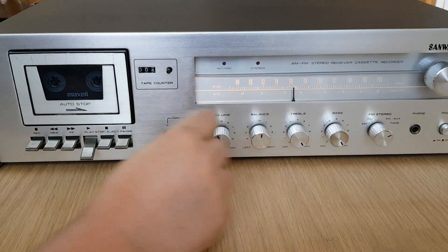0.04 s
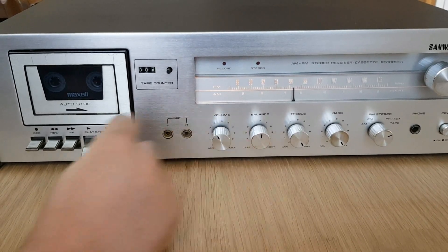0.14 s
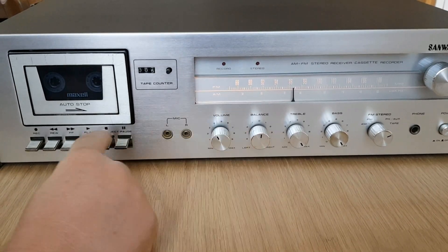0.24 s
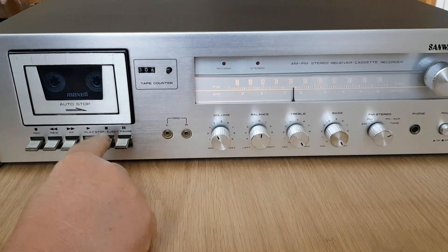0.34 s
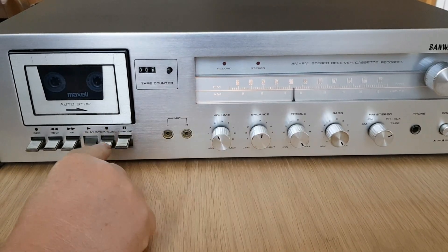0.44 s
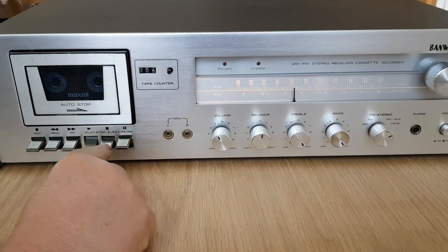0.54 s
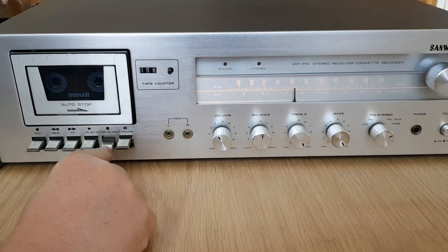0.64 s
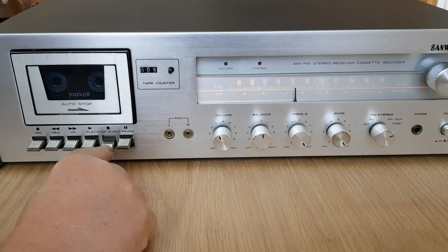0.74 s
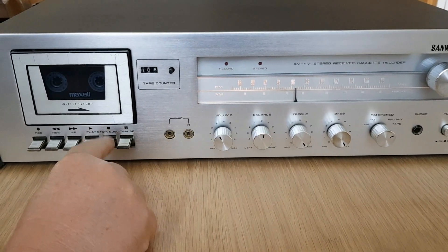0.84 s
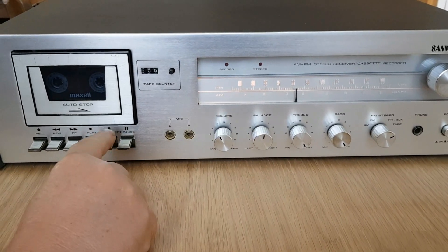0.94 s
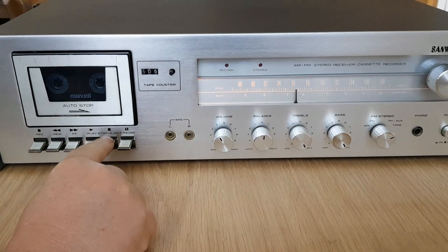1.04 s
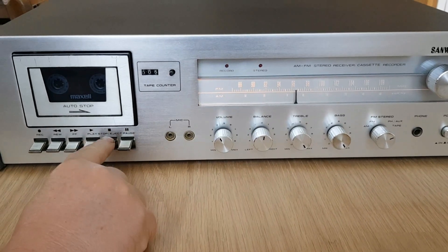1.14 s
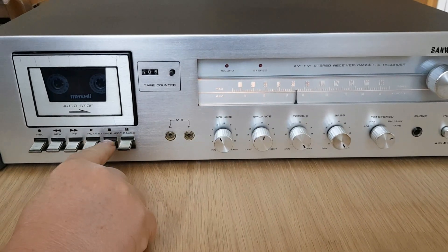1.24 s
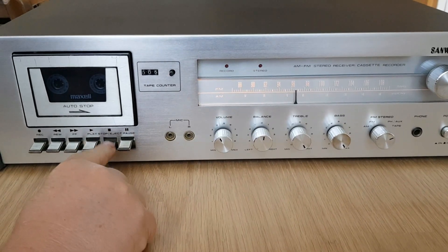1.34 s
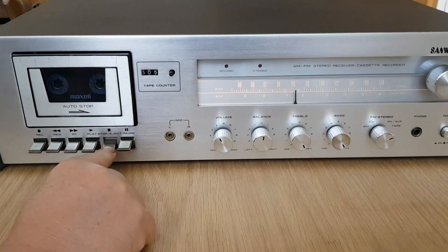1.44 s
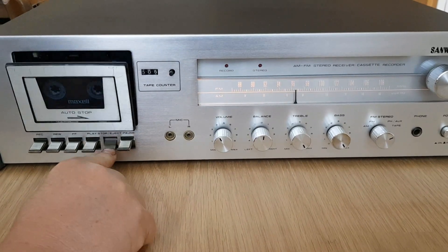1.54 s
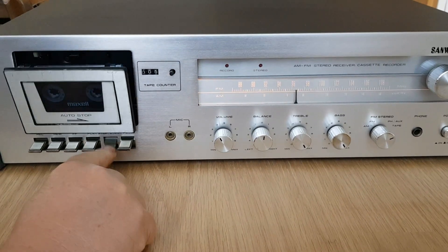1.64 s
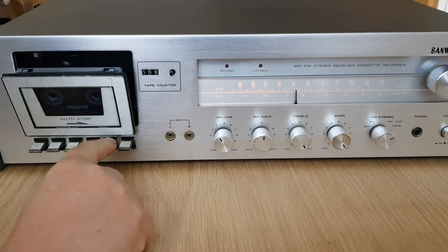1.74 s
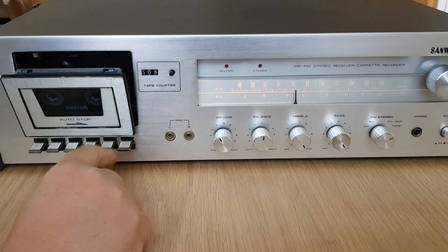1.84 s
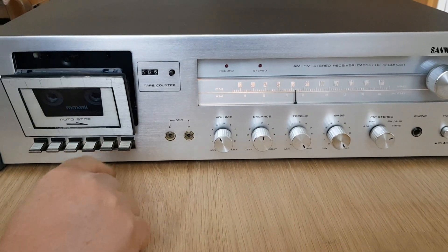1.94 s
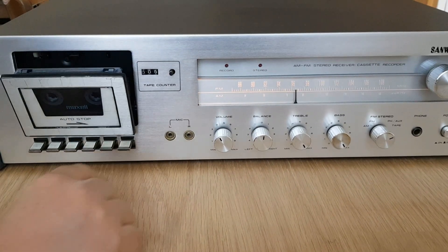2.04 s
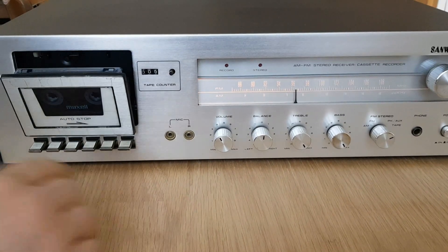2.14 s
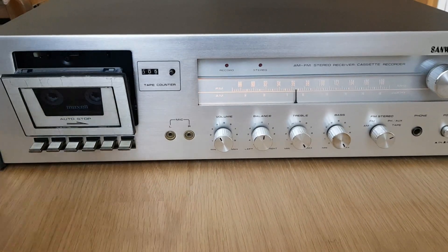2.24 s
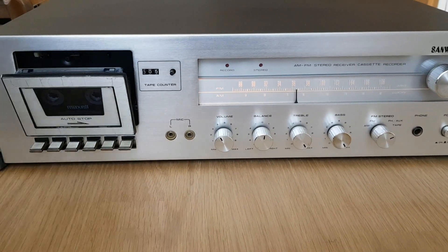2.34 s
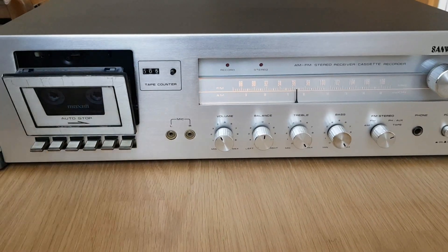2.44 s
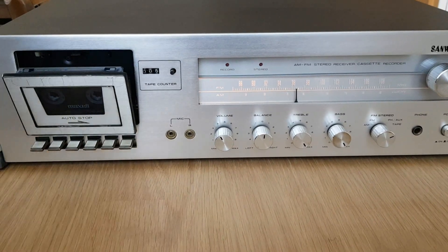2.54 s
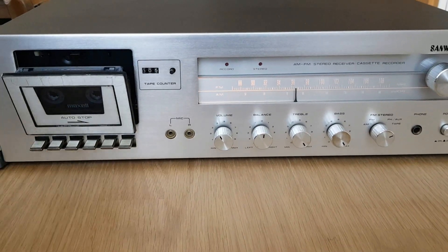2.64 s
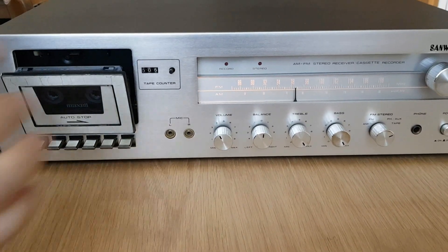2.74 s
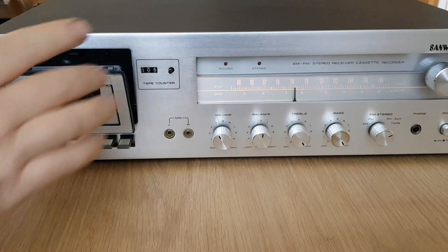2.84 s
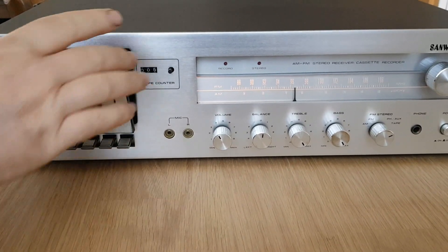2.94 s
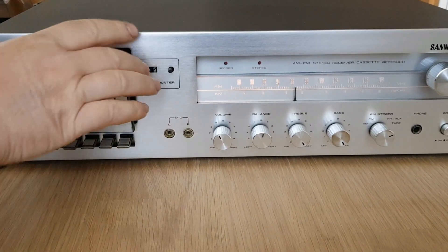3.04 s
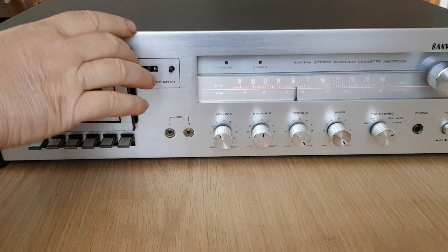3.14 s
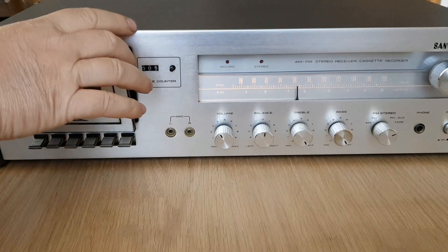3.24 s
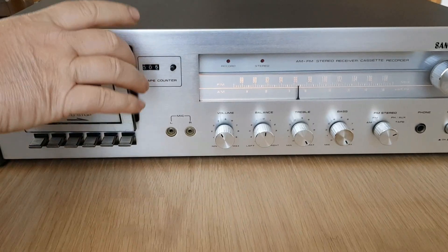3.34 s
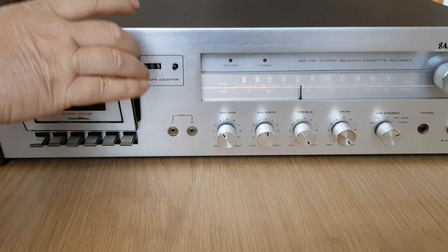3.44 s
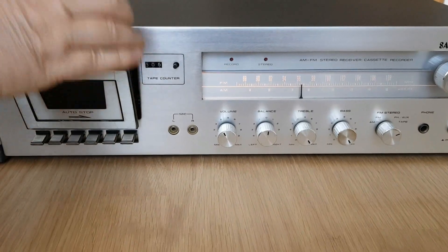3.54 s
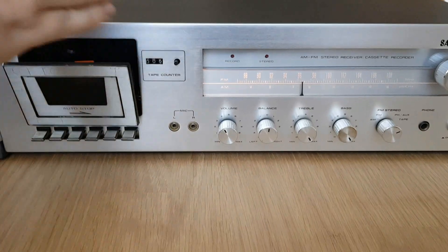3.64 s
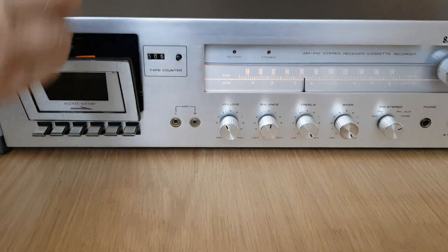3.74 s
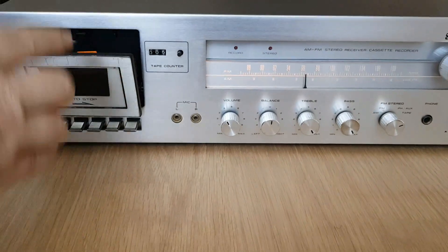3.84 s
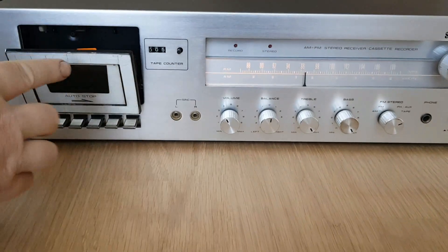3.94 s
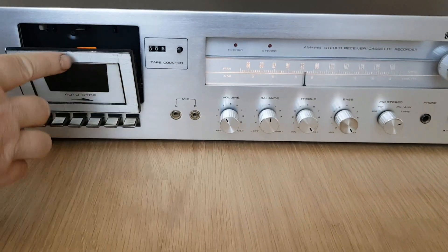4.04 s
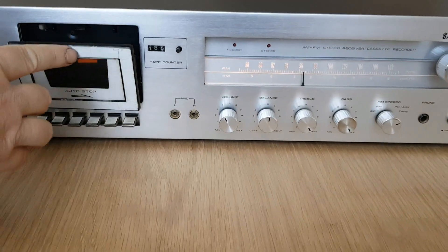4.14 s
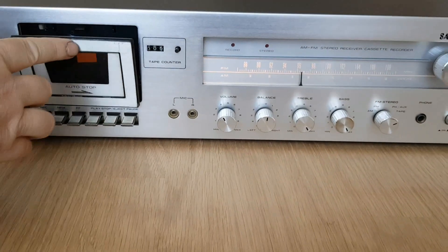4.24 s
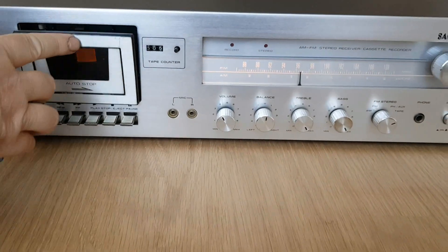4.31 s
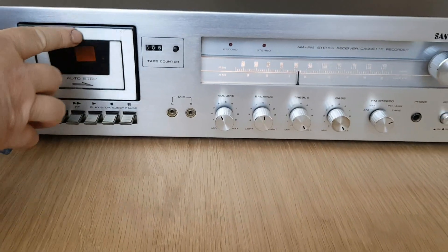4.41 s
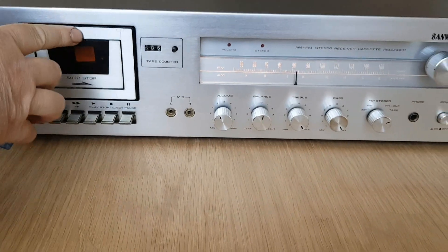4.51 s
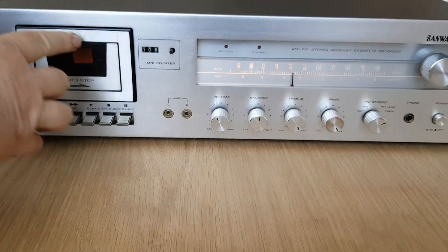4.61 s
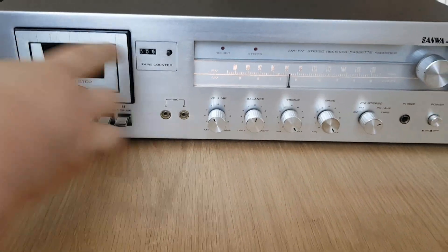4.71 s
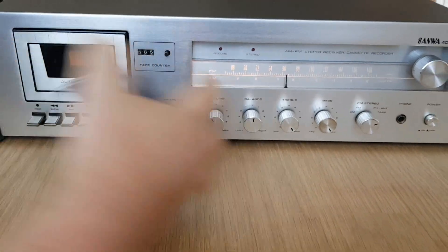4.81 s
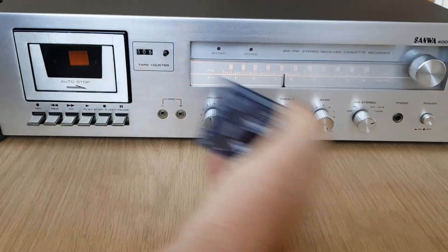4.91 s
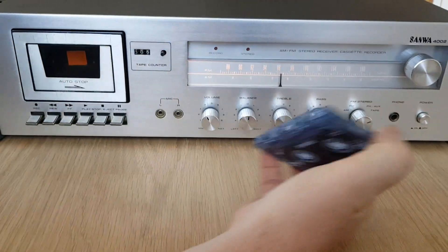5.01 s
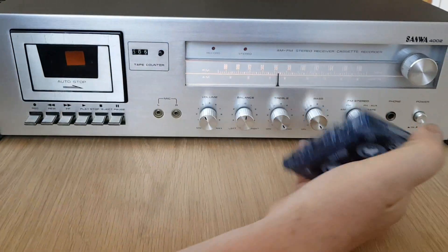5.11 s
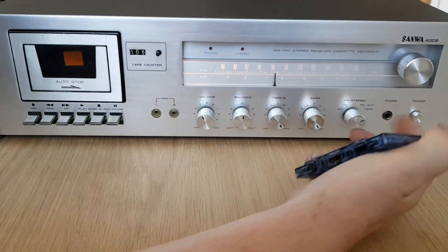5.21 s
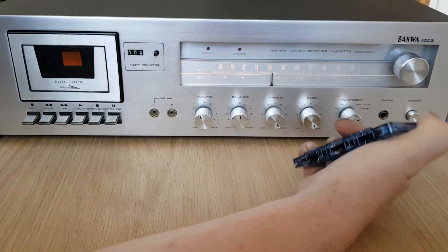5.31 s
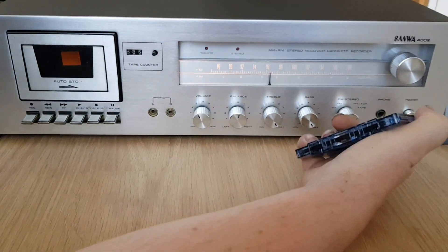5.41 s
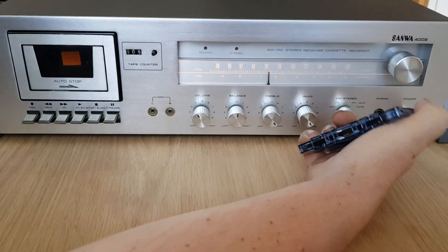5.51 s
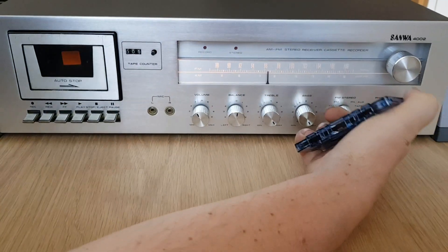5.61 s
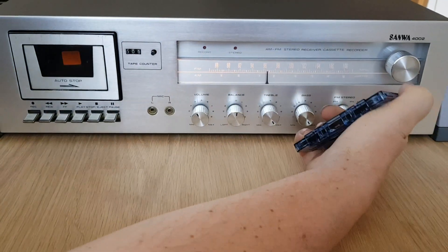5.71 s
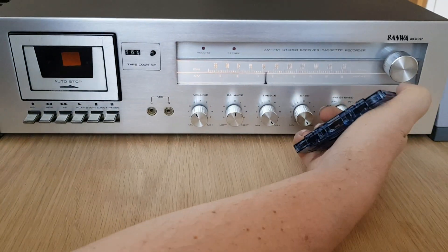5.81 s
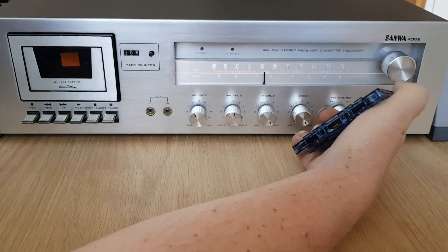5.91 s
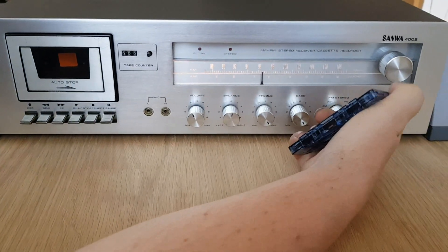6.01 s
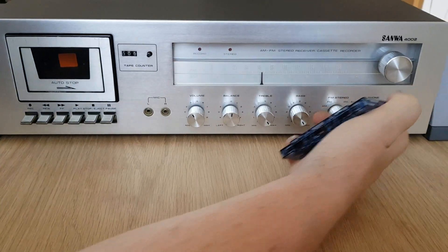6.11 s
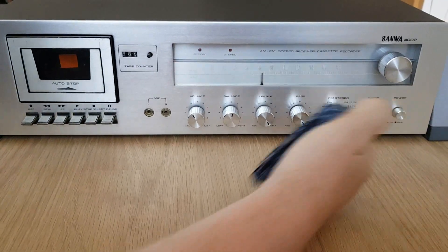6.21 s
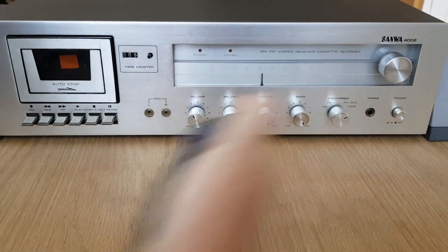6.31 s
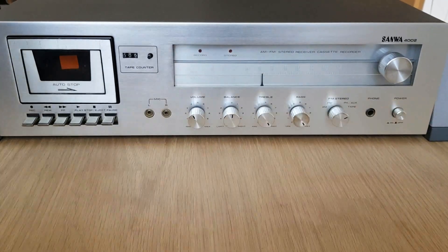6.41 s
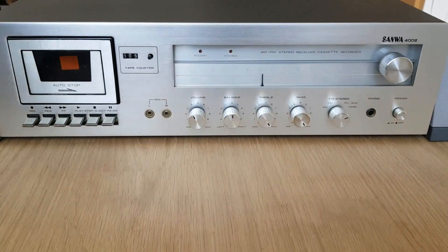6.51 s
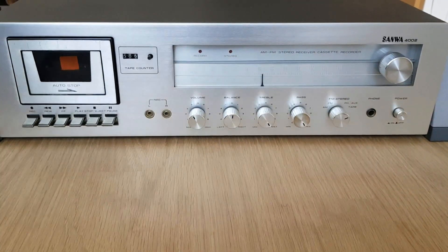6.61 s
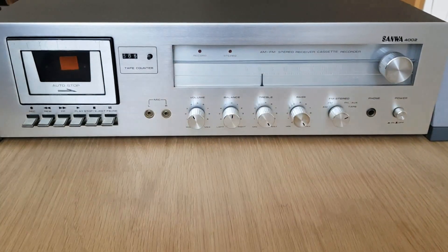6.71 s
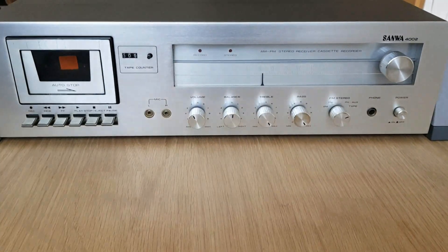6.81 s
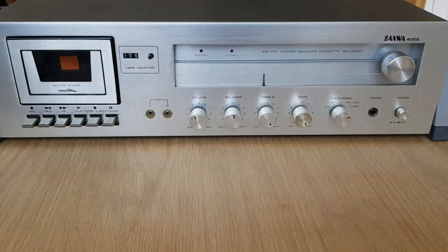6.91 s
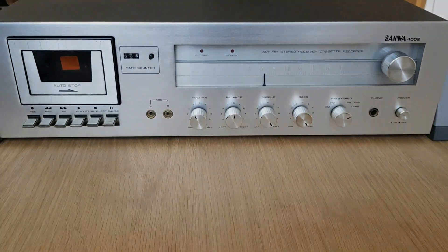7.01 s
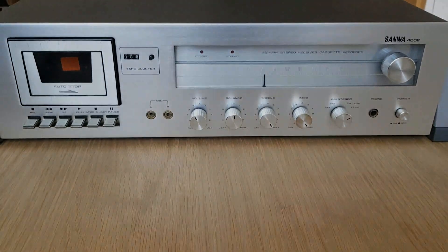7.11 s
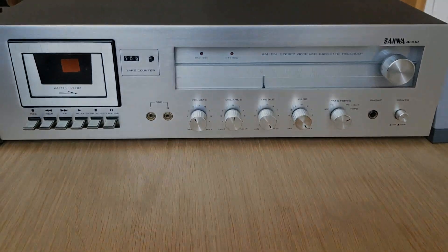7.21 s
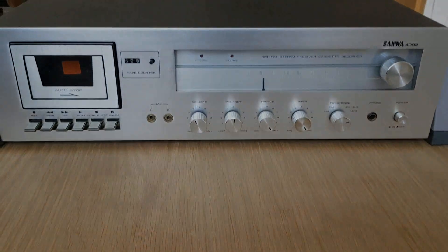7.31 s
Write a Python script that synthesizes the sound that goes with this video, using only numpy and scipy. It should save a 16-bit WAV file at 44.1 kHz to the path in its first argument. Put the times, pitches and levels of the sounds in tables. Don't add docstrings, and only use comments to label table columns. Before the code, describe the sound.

Close hard key clunks and a springy door clatter in a quiet room, then squeaky plastic scraping, a shutting click and small cassette rattles.

```python
import sys
import numpy as np
from scipy import signal
from scipy.fft import rfft, irfft, next_fast_len
from scipy.io import wavfile
from scipy.ndimage import uniform_filter1d, map_coordinates

SR = 44100
rng = np.random.default_rng(int(sys.argv[2]) if len(sys.argv) > 2 else 0)


def voltage_ratio(decibels):
    exponent = np.asarray(decibels, float) / 20
    return 10 ** exponent


def bounce(signal):
    frames = np.transpose(np.atleast_2d(signal))
    limited = np.clip(frames, -1, 1)
    pcm = np.round(limited * 32767).astype(np.int16)
    wavfile.write(sys.argv[1], SR, pcm)


N = 324352
T = np.arange(N) / SR


def unit(x):
    return x / np.sqrt(np.mean(x ** 2) + 1e-20)


def along(points, hz):
    f, v = np.transpose(points)
    return np.interp(np.log(hz + 1), np.log(f + 1), v, left=v[0] - 20)


def curves(rows):
    s, *cols = np.transpose(rows)
    return [np.interp(T, s, c, left=-150, right=-150) for c in cols]


def wobble(rate):
    return map_coordinates(rng.standard_normal(int(N * rate / SR) + 4), [T * rate])


def filtered(x, response):
    m = next_fast_len(x.shape[-1] + 2048, real=True)
    return irfft(rfft(x, m) * response(np.fft.rfftfreq(m, 1 / SR)), m)[..., :x.shape[-1]]


def hiss(spectrum):
    return unit(filtered(rng.standard_normal(N), lambda hz: voltage_ratio(along(spectrum, hz))))


def add(track, s, sound):
    at = round(s * SR)
    track[..., at:at + sound.shape[-1]] += sound[..., :N - at]


def patchy(x, patchy_db):
    z = signal.stft(x, nperseg=1024)[2]
    field = uniform_filter1d(uniform_filter1d(rng.standard_normal(z.shape), 20, 0), 16, 1)
    return unit(signal.istft(z * voltage_ratio(patchy_db * unit(field)), nperseg=1024)[1][:N])


def floor():
    # time in seconds, level in dB.
    air_gain = [(0, -66.5), (.5, -68.5), (2.2, -68.5), (3, -70.5), (4.1, -70.5), (4.7, -68.5),
                (5.25, -63.5), (5.6, -69.5), (6.2, -64.5), (6.35, -73), (6.85, -79.5), (7.35, -83)]
    # Hz, level in dB.
    open_colour = [(6500, -40.5), (8000, -12.5), (9500, -1), (11300, 3), (13000, 2.5), (15500, -6.5)]
    whistle_colour = [(7000, -39.5), (8500, -19.5), (9500, -11), (11300, 1), (12300, -14), (15500, -11.5)]
    preamp_colour = [(40, 1), (200, -2.5), (500, -10.5), (1500, -15), (5000, -22.5), (8000, -27.5),
                     (15000, -30.5)]
    room_colour = [(300, -11.5), (600, -4), (1500, -6.5), (3700, -8.5), (4150, -2), (6000, -4),
                   (7500, -16.5), (8500, -29)]
    drone_colour = [(25, 1), (45, -1.5), (120, -9.5), (190, -0.5), (310, -8.5), (400, -16.5), (600, -41.5)]
    # Hz, level in dB.
    mains = [(95, -65), (150, -61), (250, -65), (300, -70.5), (550, -83.5)]
    hiss_db, = curves(air_gain)
    room_db = -68 + 1.1 * (hiss_db + 67.5)
    drone_db = -64 + 0.6 * (hiss_db + 67.5)

    start_s, end_s, depth_db, edge_s = 2.14, 3.7, 5.5, 0.067
    lull = np.interp(T, [start_s - edge_s, start_s, end_s, end_s + 25 * edge_s], [0, 1, 1, 0])
    murmur_db = -68 + 0.96 * (hiss_db + 68.0) - depth_db * lull

    hum = sum(voltage_ratio(db + wobble(9.7)) * np.sin(2 * np.pi * hz * T) for hz, db in mains)
    drone = voltage_ratio(drone_db + 62.5) * hum
    drone += voltage_ratio(drone_db + 1.5 + 0.66 * wobble(2.1)) * hiss(drone_colour)
    tone = patchy(hiss(room_colour), patchy_db=1.7)
    murmur = filtered(tone, lambda hz: hz < 3800)
    left = voltage_ratio(hiss_db + 4.5 + 1.1 * wobble(28)) * patchy(hiss(open_colour), patchy_db=1.0)
    left += voltage_ratio(room_db + 2.5) * (tone - murmur) + voltage_ratio(murmur_db + 4.0) * murmur
    right = voltage_ratio(hiss_db + 1.0) * hiss(whistle_colour) + voltage_ratio(-75.0) * hiss(preamp_colour)
    return np.array([left + drone, right + voltage_ratio(-23.5) * drone])


def ringing(modes, ring_db):
    return lambda f: 1 + sum(voltage_ratio(db + ring_db) * 1j * f * w / (c * c - f * f + 1j * f * w) for c, w, db in modes)


def contacts(events, modes, touch, ring_db, gain_db, spiky_db):
    # Hz, level in dB.
    clack_colour = [(200, -19), (500, 2.5), (1500, -1.5), (4500, -5.5), (6300, -9.5), (7800, -13),
                    (10000, 4), (15000, 1)]
    track, t = np.zeros(N), np.arange(6000) / SR
    lead = .008
    tick_db, brighter, rattle_s, longer, thin_db = touch

    def dull(hz):
        return 1 / (1 + (hz / 5000) ** 2)

    for s, db, body_db, part_hz in events:
        lighter_db = -40 - db
        t60 = rattle_s * voltage_ratio(longer * lighter_db)
        top_db = tick_db + brighter * lighter_db + thin_db * np.log2(part_hz / 2000)
        tilt = [(300, body_db), (1800, body_db), (3000, 0), (7000, 0.00086), (9000, top_db)]
        grit = rng.standard_normal(len(t)) * voltage_ratio(spiky_db * np.repeat(rng.standard_normal(300), 20))
        part = ringing([(part_hz, part_hz / 8, 0)], ring_db=4)

        def shape(hz):
            colour = voltage_ratio(along(clack_colour, hz) + along(tilt, hz)) * part(hz)
            return colour * [dull(hz), 1 - dull(hz)]

        body, tick = filtered(grit / np.std(grit), shape)
        away = np.abs(t - lead)
        fall_db = -60 * (away / np.clip(t60, .01, .25)) ** 1.223
        rise = max(.0008 - .000025 * (db + 15), .0003)
        swell = voltage_ratio(-30.0) * t / lead + (1 - np.exp(-np.maximum(t - lead, 0) / rise)) ** 2
        crack = 1 + 2.5 * voltage_ratio(-60 * away / 0.0096)
        chatter = body * voltage_ratio(fall_db) + tick * voltage_ratio(2.18 * fall_db) * crack
        add(track, s - lead - .001, voltage_ratio(db + gain_db) * swell * chatter)
    return filtered(track, ringing(modes, ring_db))


def cabinet():
    # time in seconds, peak in dB, table boom in dB over it.
    thuds = [(0.403, -53, -29), (0.594, -26.5, -15), (0.611, -27, -2), (0.79, -33, -13),
             (1.183, -61.5, -13.5), (1.345, -41.5, -5), (1.433, -31, -9.5), (1.46, -33, -2),
             (1.661, -40, -9), (2.826, -53.5, -12), (3.157, -41.5, -5.5), (3.419, -43.5, 1),
             (4.407, -32, -3.5), (4.428, -31, -5), (5.839, -59, 4.5), (6.031, -50.5, 0)]
    # Hz, level in dB, t60 in seconds.
    case_modes = [(214.1, 3, 0.21), (301.4, -6, 0.16), (423.3, -12, 0.27), (491, -8.5, .2),
                  (614.3, -7.5, 0.17)]
    table_modes = [(132.5, 0.5, 0.52), (57.7, -11.5, 0.7)]
    # Hz, level in dB.
    panel_colour = [(60, -18), (120, -1), (220, 3), (450, -9), (800, -29.5)]
    track, t = np.zeros(N), np.arange(SR // 2) / SR
    boom = sum(voltage_ratio(level - 60 * t / t60) * np.sin(2 * np.pi * hz * t) for hz, level, t60 in table_modes)
    boom = boom * (1 - np.exp(-t / 0.0056))
    panels = hiss(panel_colour)
    for s, db, boom_db in thuds:
        case = voltage_ratio(-11.5 - 60 * t / 0.38) * panels[round(s * SR):][:len(t)]
        for hz, level, t60 in case_modes:
            ring_db = level + rng.normal(0, 0.83) - 60 * t / t60
            case += voltage_ratio(ring_db) * np.sin(2 * np.pi * hz * rng.normal(1, .006) * t)
        blow = case * (1 - np.exp(-t / 0.0029)) + voltage_ratio(boom_db) * boom
        add(track, s, voltage_ratio(db + 4.5) * blow * np.cos(np.pi * t))
    return track * voltage_ratio(1.2 * wobble(25))


def keys():
    # time in seconds, clack in dB, body in dB over the clack, struck part in Hz.
    key_hits = [
        (0.4094, -65, 6, 1230),
        (0.5922, -18.5, -7.5, 5400),
        (0.6006, -19.5, -5.5, 1040),
        (0.6164, -33, 0.5, 1000),
        (0.7745, -40, -3, 1110),
        (0.78, -19, -3, 1197),
        (0.7845, -29, -3, 4150),
        (0.8228, -37, 0, 800),
        (1.1692, -56.5, -6.5, 1490),
        (1.3396, -31.5, -5, 3050),
    ]
    # Hz, width in Hz, level in dB.
    key_modes = [(796, 53, 0.5), (1110, 240, -3), (1540, 67, -8.5), (2100, 100, -6), (2900, 120, -12),
                 (4170, 150, -4.5)]
    return contacts(key_hits, key_modes, (-10.5, 0.17, 0.1, 0.13, 4), ring_db=4.0, gain_db=8, spiky_db=4)


def door():
    # time in seconds, clack in dB, body in dB over the clack, struck part in Hz.
    door_hits = [(1.427, -37.5, 4, 1120), (1.4312, -15.5, 1.5, 1560), (1.4368, -18, 3, 1590),
                 (1.4413, -16.5, -5, 4480), (1.4468, -17, -1.5, 2240), (1.4575, -14, 1, 4400),
                 (1.4615, -14.5, 1, 1570), (1.469, -21.5, 3, 1680), (1.481, -30, -4, 1520),
                 (1.4951, -38.5, 6, 1810), (1.62, -22, -3.5, 4840), (1.6569, -29.5, 5, 765),
                 (4.075, -74.5, 15, 600), (4.138, -45.5, -0.5, 2040), (4.2034, -58.5, 10.5, 1290),
                 (4.3843, -52.5, 15.5, 760), (4.3934, -24, -2.5, 3780), (4.4085, -15, -3.5, 2900),
                 (4.4298, -35.5, 5.5, 704)]
    # Hz, width in Hz, level in dB.
    door_modes = [(1190, 150, 0), (1590, 110, -0.5), (1990, 180, -4), (2360, 150, -6), (2900, 150, -6),
                  (4850, 330, -11)]
    touch = (-11, 0.06, 0.08, 0.34, 0.3)
    return contacts(door_hits, door_modes, touch, ring_db=-1.5, gain_db=5.5, spiky_db=-0.5)


def springs():
    # time in seconds, Hz, level in dB, t60 in seconds.
    coils = [
        (4.5, 503, -55.5, 2.8),
        (7.07, 870, -47.5, 0.2),
        (4.92, 850, -41, 0.18),
        (1.47, 1590, -34, 0.3),
        (1.49, 1790, -32.5, .3),
    ]
    track, t = np.zeros(N), np.arange(SR) / SR
    sway = np.cumsum(1 + .015 * wobble(60)[:SR]) / SR
    beat = voltage_ratio(1.8 * wobble(60)[:SR])
    for s, hz, db, t60 in coils:
        ring = beat * voltage_ratio(db - 60 * t / t60) * np.sin(2 * np.pi * hz * sway)
        add(track, s, ring * (1 - np.exp(-t / 0.0086)) * np.cos(np.pi * t / 2))
    return track * voltage_ratio(1.2 * wobble(25))


def jolt(t, db, hz):
    turns = 1.405 * hz * t / (1 + 16 * t)
    return voltage_ratio(db - 60 * (t * hz / 5) ** 1.33) * (1 - np.exp(-t / 0.0018)) * -np.cos(2 * np.pi * turns - 1.2)


def grip():
    # time in seconds, peak in dB, Hz.
    bumps = [(2.509, -44, 78), (2.715, -48.5, 96.7), (2.765, -47.5, 109), (2.836, -38, 107),
             (2.965, -42.5, 95.5), (3.047, -40.5, 87), (3.112, -44, 116), (3.239, -36, 148),
             (3.285, -37.5, 143), (3.374, -39, 68), (3.403, -43, 111), (3.481, -43, 115), (3.513, -50, 100),
             (3.594, -34, 160), (3.672, -47, 83.5), (3.753, -20.5, 108), (3.834, -46, 79.5),
             (4.006, -25, 108.3), (4.132, -50, 66), (4.633, -46.5, 82.3), (4.783, -44, 98),
             (4.874, -45.5, 97), (5.137, -45, 60.6), (5.536, -44.5, 65.2), (6.401, -43.5, 101),
             (6.462, -43, 77), (6.522, -37.5, 84.6), (6.654, -40, 98), (6.764, -39, 99.5), (6.932, -45, 93)]
    # time in seconds, level in dB.
    effort = [(0, -86), (2.4, -85), (2.5, -64.5), (3.3, -53), (3.8, -50), (4.15, -52), (4.22, -61.5),
              (4.6, -61.5), (5.2, -59.5), (5.3, -68), (5.55, -56), (5.65, -72), (6.2, -73), (6.3, -59.5),
              (6.8, -56), (7.05, -61.5), (7.15, -83), (7.35, -60.5)]
    track, t = np.zeros((2, N)), np.arange(SR // 6) / SR
    effort_db, = curves(effort)
    chance = rng.standard_normal((150, 3))
    spacing_s = .055
    when = spacing_s * (np.arange(len(chance)) + 2 + 0.247 * chance[:, 0])
    fidgets = []
    for s, (u, v) in zip(when, chance[:, 1:]):
        if s < T[-1] and effort_db[round(s * SR)] > -72:
            db = -51 + 0.67 * (effort_db[round(s * SR)] + 57) + 3.2 * u
            fidgets.append((s, db, 90 * voltage_ratio(2.65 * np.tanh(v))))
    for s, db, hz in bumps + fidgets:
        slow = voltage_ratio(1.28 * db - 1.5 - 60 * t / 0.17) * -np.sin(2 * np.pi * 62 * t) * (1 - np.exp(-t / 0.0067))
        add(track, s - .0065, np.array([slow, jolt(t, db + 4.5, hz)]))
        add(track[1], min(s + 0.0159, T[-1]), jolt(t, db - 4.0, .6 * hz))
    rumble = hiss([(25, -14.5), (50, 2.5), (130, -7), (300, -21.0), (500, -30.5), (900, -50.5)])
    rumble = rumble * voltage_ratio(effort_db + 4.3 * wobble(24))
    return track + rumble * voltage_ratio([[-22], [0]])


def scrape():
    # start, peak and end in seconds, rub in dB, grit in dB.
    strokes = [
        (2.95, 3.015, 3.32, -61, -69),
        (3.301, 3.416, 3.57, -45.5, -52.5),
        (4.75, 4.8, 4.9, -80, -67.5),
        (4.864, 4.94, 5.124, -56, -57),
        (5.05, 5.249, 5.5, -82, -63.5),
        (6.03, 6.042, 6.276, -54.5, -58.5),
        (6.02, 6.203, 6.38, -72, -57.5),
        (6.6, 6.678, 6.95, -65.5, -71),
        (7.052, 7.072, 7.3, -67.5, -66.5),
    ]
    # start and end in seconds, start and end in Hz, level in dB.
    squeaks = [
        (3.35, 3.453, 1645, 1624, -52),
        (3.366, 3.45, 2980, 2980, -50),
        (3.466, 3.506, 3110, 3070, -50),
        (3.495, 3.531, 3950, 4190, -56),
        (4.891, 4.95, 1604, 1494, -48),
        (4.198, 4.251, 1517, 1278, -59),
        (6.647, 6.708, 1635, 1500, -62),
    ]
    rub_fade_db, grit_fade_db = 24, 17.5
    rub, grit = np.zeros((2, N))
    for start, peak, end, rub_db, grit_db in strokes:
        rub_lo, grit_lo = rub_db - rub_fade_db, grit_db - grit_fade_db
        rub_curve, grit_curve = curves([(start, rub_lo, grit_lo), (peak, rub_db, grit_db), (end, rub_lo, grit_lo)])
        rub += voltage_ratio(rub_curve)
        grit += voltage_ratio(grit_curve)
    clumps = voltage_ratio(2.6 * wobble(400) + 2.2 * wobble(60))
    dull = hiss([(300, -3.5), (600, 2), (1500, -0.5), (2200, -8), (3500, -26.0)])
    sharp = hiss([(1500, -20.5), (2400, 0.5), (5500, 0), (7800, -18.5), (10000, -10.0), (15000, -9.5)])
    track = voltage_ratio(0.5) * rub * unit(clumps * dull) + voltage_ratio(1.5) * grit * unit(clumps * sharp)
    flutter, drift = voltage_ratio(4.8 * wobble(220)), 1 + 0.043 * wobble(300)
    for start, end, from_hz, to_hz, db in squeaks:
        span = slice(round(start * SR), round(end * SR))
        u = np.linspace(0, 1, span.stop - span.start)
        phase = 2 * np.pi * np.cumsum((from_hz + (to_hz - from_hz) * u) * drift[span]) / SR
        add(track, start, voltage_ratio(db) * flutter[span] * np.sin(phase) * np.sin(np.pi * u ** 0.44) ** .5)
    return track


def holder():
    # time in seconds, clack in dB, body in dB over the clack, struck part in Hz.
    holder_hits = [(2.9857, -51.5, -9.5, 5170), (3.1455, -32, -1.5, 1520), (3.1607, -35.5, -1.5, 1520),
                   (3.3504, -51, -3, 1590), (3.376, -45, 5, 1530), (3.4174, -44, 5, 1650),
                   (3.4294, -45, -2, 1670), (3.476, -48.5, 5.5, 1150), (3.4924, -50, 4, 1120),
                   (3.5314, -51.5, -1, 3930), (3.6681, -50, 1.5, 1540), (3.7459, -52.5, 3, 1540),
                   (3.7591, -47.5, 3, 1360), (3.7794, -48, 3, 1370), (3.9325, -54, -4, 4920)]
    # Hz, width in Hz, level in dB.
    holder_modes = [(1240, 97, -2), (1540, 130, -3.5), (2150, 85, -9), (2980, 290, -3.5), (4100, 99, -24),
                    (4920, 190, -8)]
    touch = (-14, 0.25, 0.12, -0.03, 0)
    return contacts(holder_hits, holder_modes, touch, ring_db=3.0, gain_db=7.0, spiky_db=3.5)


def slips():
    # time in seconds, level in dB, ring in Hz.
    rib_slips = [(3.3495, -41, 1600), (3.359, -39, 1650), (3.368, -42, 2950), (3.377, -39, 2980),
                 (3.3842, -36, 1640), (3.395, -37, 3000), (3.405, -33, 3020), (3.4165, -30.5, 1594),
                 (3.4213, -32, 1700), (3.4254, -29.5, 1645), (3.43, -32, 1605), (3.4332, -37.5, 3000),
                 (3.44, -38, 1645), (3.477, -34.5, 2980), (3.484, -37, 3230), (3.4916, -38, 3000),
                 (3.5315, -41, 2800), (3.5365, -33.5, 3740), (3.547, -42, 3900), (3.6705, -44, 1680),
                 (3.7785, -38, 1500), (3.9325, -40, 4740), (4.1385, -43.5, 5200), (4.2035, -41, 1290),
                 (4.7644, -49, 4650), (4.785, -48, 6000), (4.8, -57, 3000), (4.8905, -36, 1560),
                 (4.9, -43, 1500), (4.9124, -35, 1420), (4.9338, -46, 1580), (4.972, -46, 3000),
                 (5.0585, -42, 3800), (5.119, -49, 3760), (5.1244, -48, 3780), (5.1355, -45, 3780),
                 (5.189, -31.5, 3030), (5.2025, -33, 2970), (6.4406, -45, 4750), (6.453, -49.5, 1450),
                 (6.6137, -52, 4700), (6.6543, -46, 1400), (6.662, -48.5, 1800), (6.7557, -46, 4900),
                 (7.0665, -52, 870), (7.2337, -52, 3950)]
    track, t = np.zeros(N), np.arange(1500) / SR
    for s, db, hz in rib_slips:
        snap = voltage_ratio(-60 * t / .0015) * rng.standard_normal(len(t))
        ring = voltage_ratio(3 - 60 * t * hz / 38) * np.sin(2 * np.pi * hz * t)
        add(track, s, voltage_ratio(db - 4) * (snap + ring))
    return filtered(track, lambda hz: 1 / (1 + 1j * hz / 6000) ** 2)


def shell():
    # time in seconds, clack in dB, body in dB over the clack, struck part in Hz.
    shell_hits = [(4.7631, -57, -32, 4650), (4.8904, -52.5, 9, 1540), (4.9244, -51.5, 4, 865),
                  (5.0589, -53.5, -32, 3940), (5.1194, -63.5, -30, 3740), (5.1357, -45.5, -37, 3900),
                  (5.1835, -38.5, -20, 3004), (5.1887, -37, -21, 3370), (5.2014, -36, -20.5, 4070),
                  (5.672, -78, 13.5, 493), (5.71, -79, 12.5, 510), (5.8426, -56.5, 6.5, 1120),
                  (5.9844, -71.5, 26.5, 1090), (6.0182, -32.5, 3, 1290), (6.2694, -62, -18, 2600),
                  (6.4408, -55.5, -14, 4770), (6.452, -70, 9, 1440), (6.6134, -59, -14.5, 4760),
                  (6.6544, -71, 19, 1300), (6.6782, -55, -23, 1540), (6.755, -51, -25, 4980),
                  (7.0658, -65, 10, 850), (7.233, -75, 5.5, 3970)]
    # Hz, width in Hz, level in dB.
    shell_modes = [(870, 61, -8), (1370, 370, -16.5), (2900, 160, -5), (4110, 250, -8)]
    touch = (-7, 0.253, 0.08, 0.21, 1.1)
    return contacts(shell_hits, shell_modes, touch, ring_db=-5.0, gain_db=10, spiky_db=1.5)


def walls(x):
    # Hz, t60 in seconds.
    decay = [(100, 1), (500, 0.47), (2000, 0.42), (5000, 0.33), (10000, 0.15), (16000, .18)]
    out, step = np.zeros((2, N)), SR * 3 // 10
    for at in range(0, N, step):
        hz, t, z = signal.stft(rng.standard_normal((2, SR * 2 // 3)), SR, nperseg=256)
        t60 = along(decay, np.maximum(hz, 100))[:, None]
        tail = signal.istft(z * voltage_ratio(-60 * t / t60), SR, nperseg=256)[1]
        tail = tail / np.linalg.norm(tail[0])
        add(out, at / SR + .004, signal.fftconvolve(x[None, at:at + step], tail, axes=1))
    return out * voltage_ratio(2.2 * np.array([wobble(260), wobble(260)]))


def covered_port(air, room):
    # Hz, level in dB.
    hand_shade = [(60, -13), (400, -14.5), (2400, -18.5), (5000, -22.5), (7000, -14), (9000, -7.5),
                  (11300, -7.5), (15000, -17)]
    t = np.arange(900) / SR
    paths = rng.standard_normal(len(t)) * voltage_ratio(-60 * t / 0.03)
    leak = signal.fftconvolve(air, paths / np.linalg.norm(paths))[:N] + room[1]

    def low(hz):
        return 1 / (1 + (hz / 550) ** 4)

    def shade(hz):
        return voltage_ratio(along(hand_shade, hz))

    bass = filtered(air + room[0], lambda hz: shade(hz) * low(hz))
    return bass + filtered(leak, lambda hz: shade(hz) * np.sqrt(1 - low(hz) ** 2))


def scene():
    deck = keys() + door() + scrape() + holder() + slips() + shell()
    air = deck + cabinet() + springs()
    room = voltage_ratio(-9) * walls(deck)
    return np.array([air + room[0], covered_port(air, room)]) + grip() + floor()


def roll_off(x):
    return signal.sosfilt(signal.butter(12, 16830, fs=SR, output="sos"), x)


def record(dry):
    mix = filtered(dry, lambda hz: (hz < 16700) * voltage_ratio(-30 * (hz > 15800)))
    return roll_off(mix)


dry = scene()
out = record(dry)
bounce(out)
```